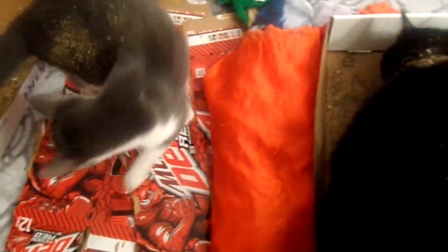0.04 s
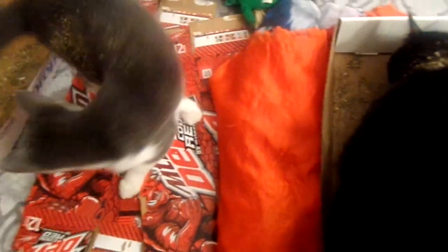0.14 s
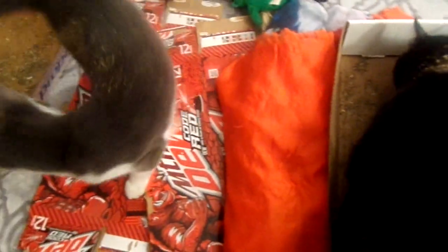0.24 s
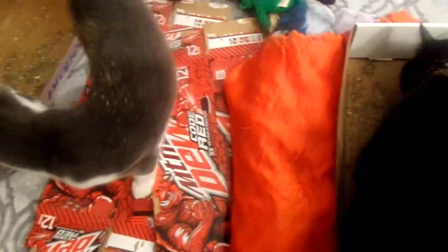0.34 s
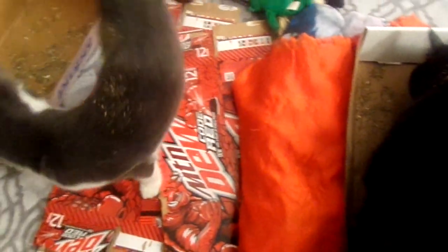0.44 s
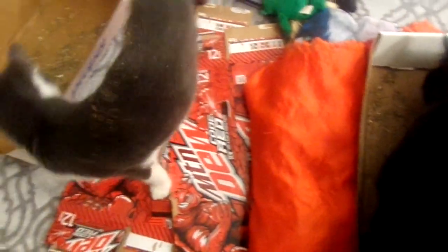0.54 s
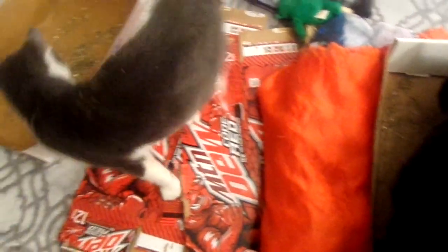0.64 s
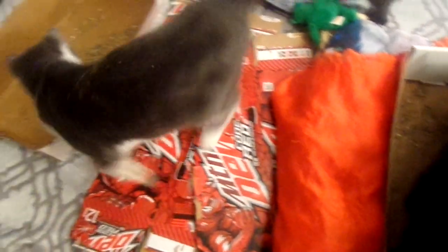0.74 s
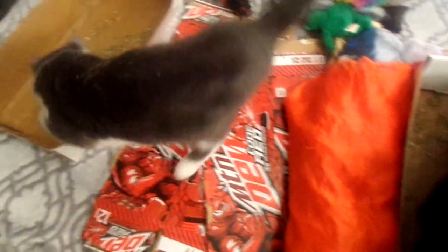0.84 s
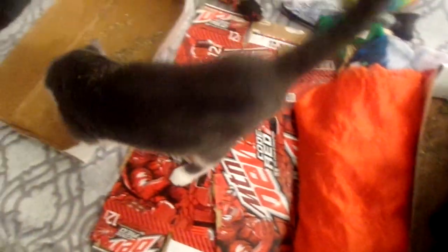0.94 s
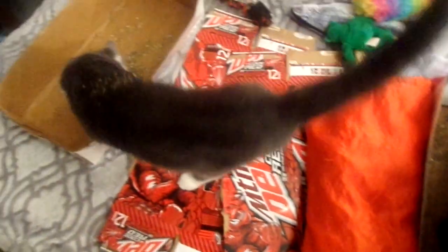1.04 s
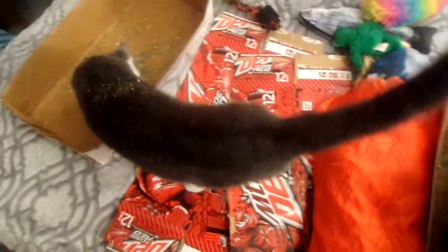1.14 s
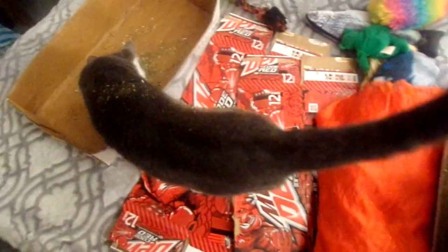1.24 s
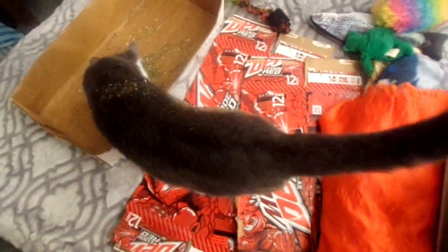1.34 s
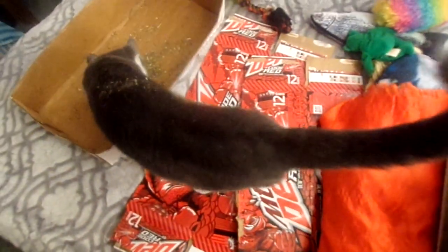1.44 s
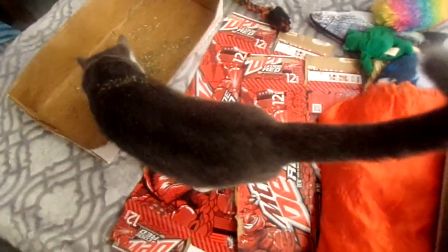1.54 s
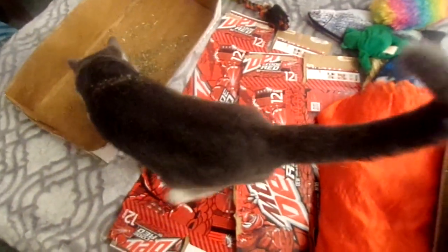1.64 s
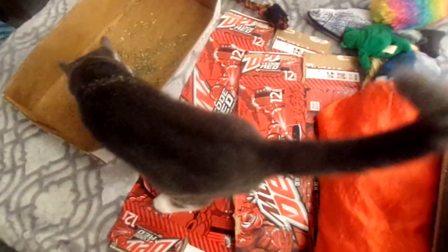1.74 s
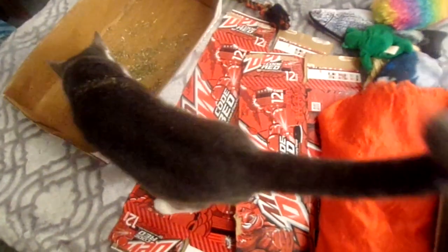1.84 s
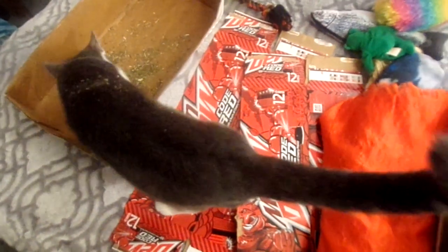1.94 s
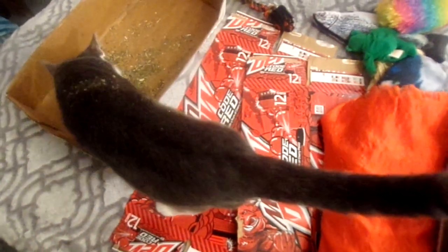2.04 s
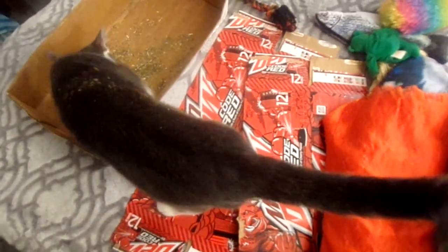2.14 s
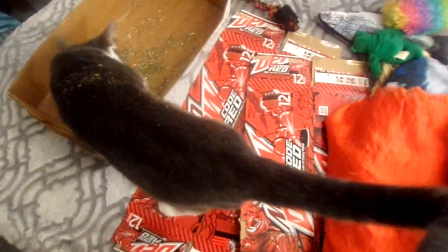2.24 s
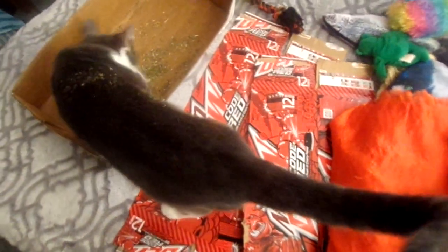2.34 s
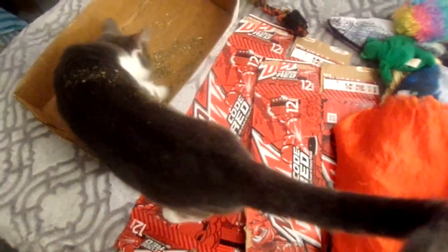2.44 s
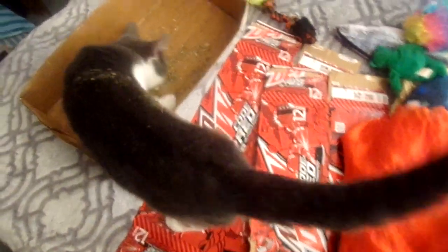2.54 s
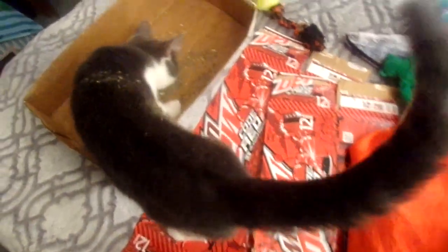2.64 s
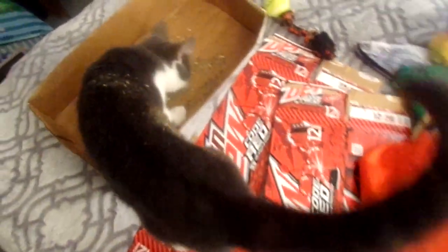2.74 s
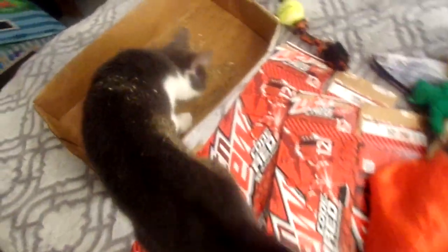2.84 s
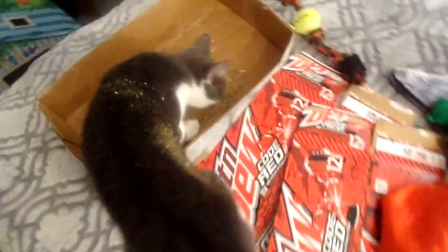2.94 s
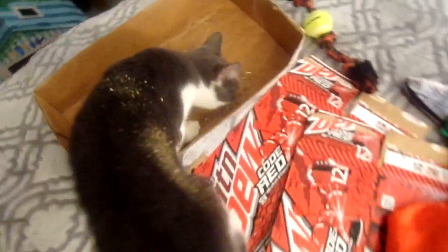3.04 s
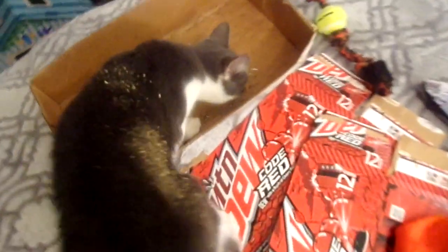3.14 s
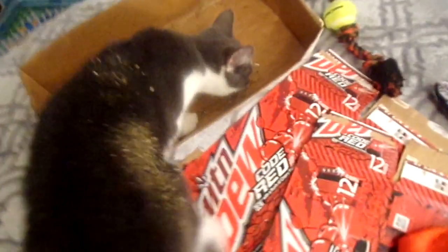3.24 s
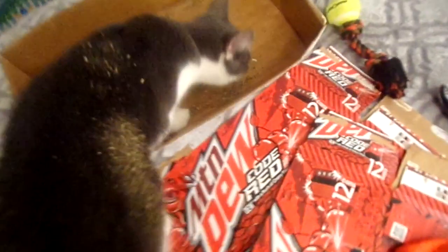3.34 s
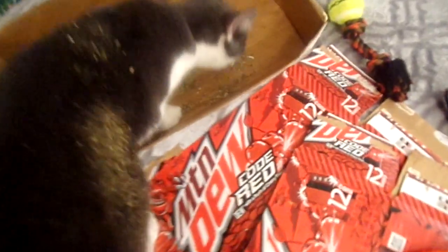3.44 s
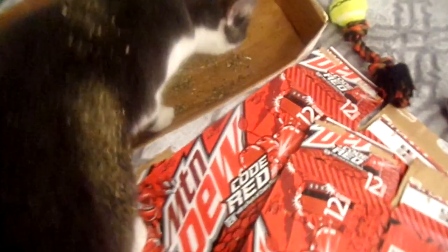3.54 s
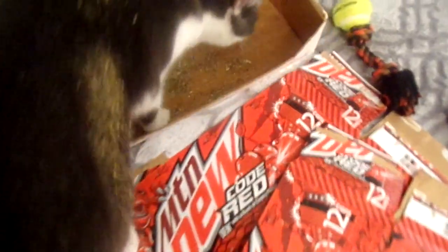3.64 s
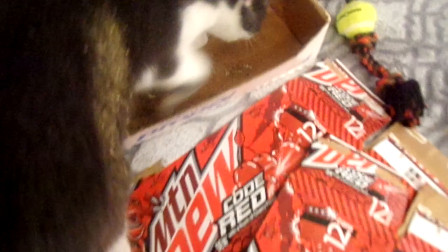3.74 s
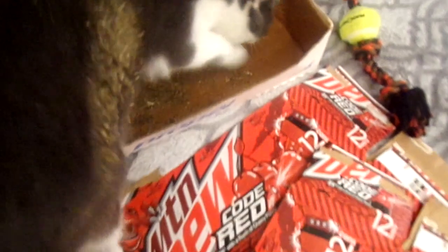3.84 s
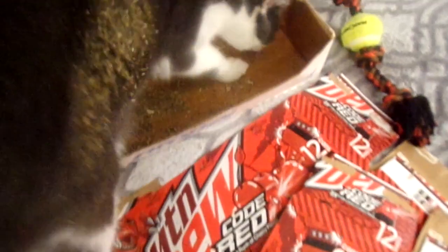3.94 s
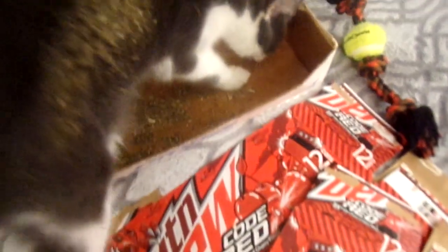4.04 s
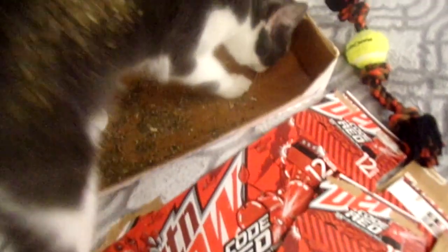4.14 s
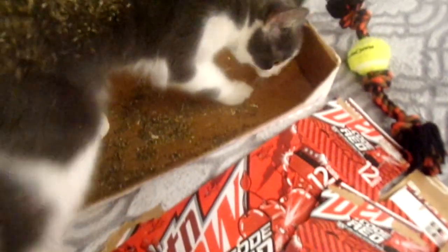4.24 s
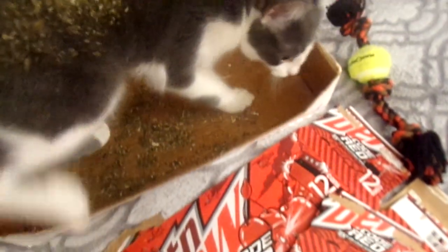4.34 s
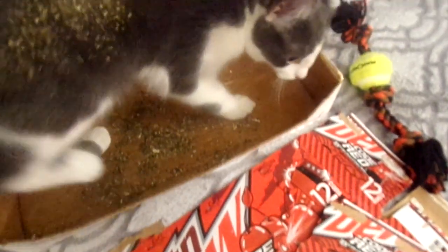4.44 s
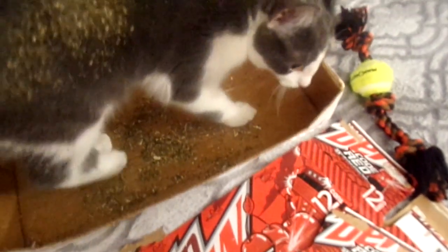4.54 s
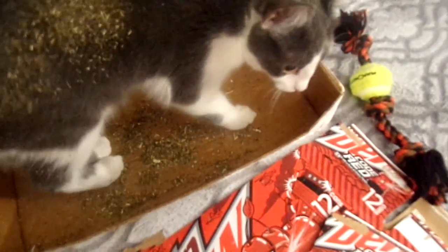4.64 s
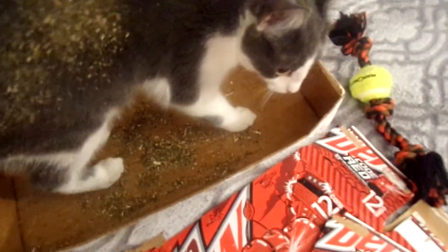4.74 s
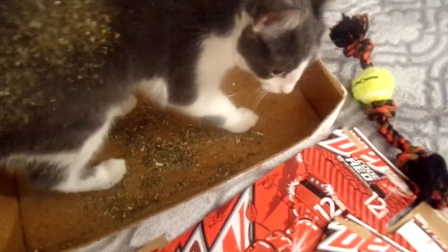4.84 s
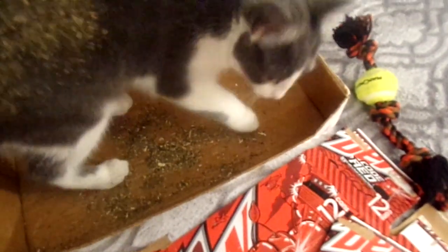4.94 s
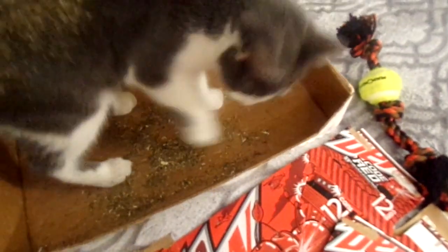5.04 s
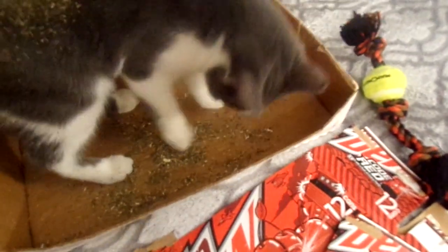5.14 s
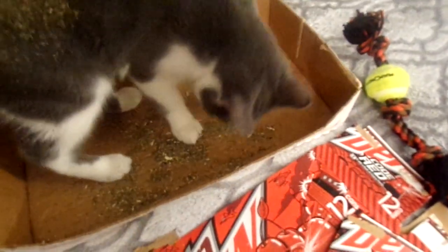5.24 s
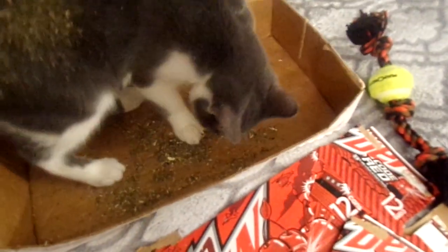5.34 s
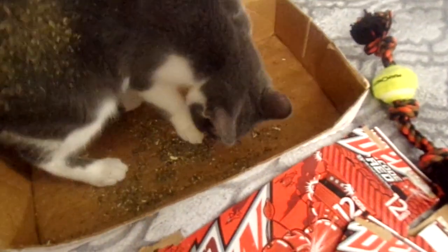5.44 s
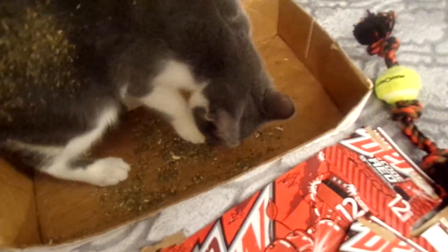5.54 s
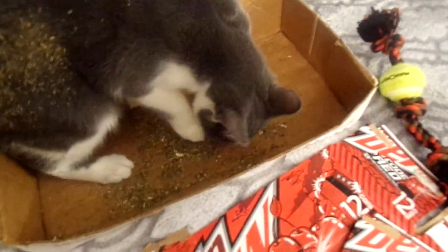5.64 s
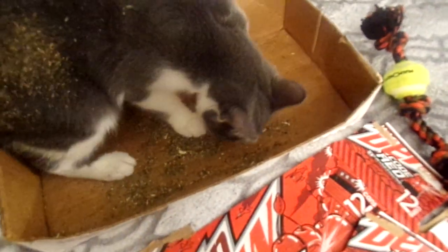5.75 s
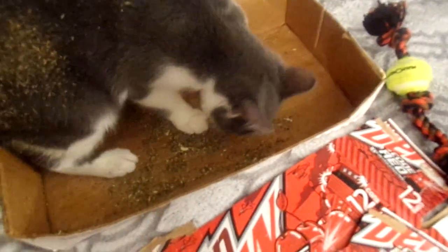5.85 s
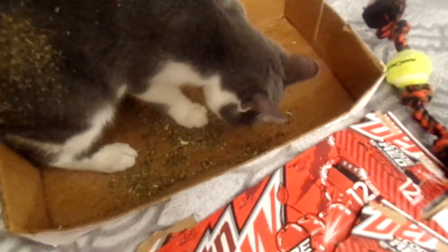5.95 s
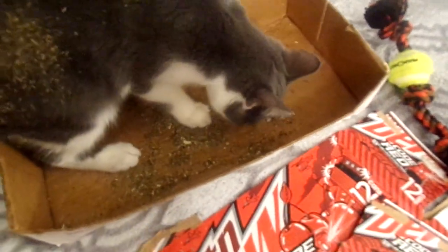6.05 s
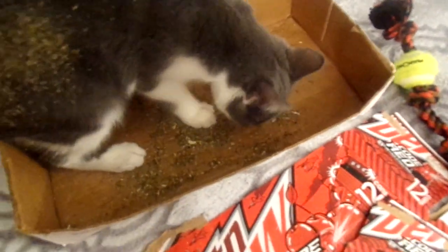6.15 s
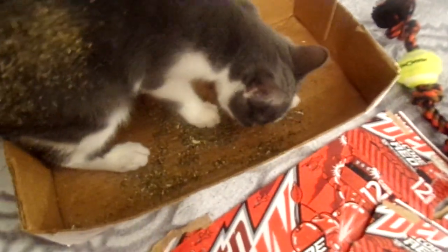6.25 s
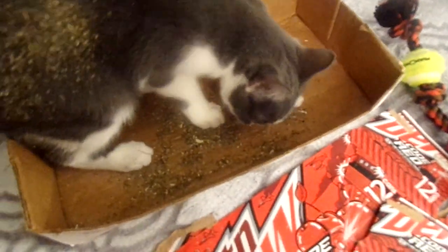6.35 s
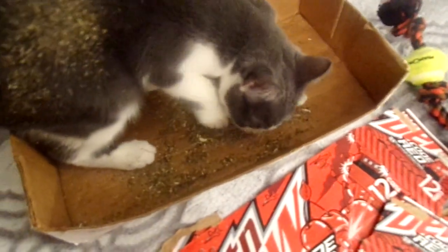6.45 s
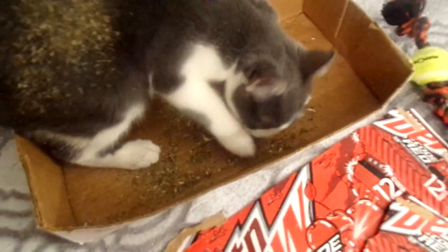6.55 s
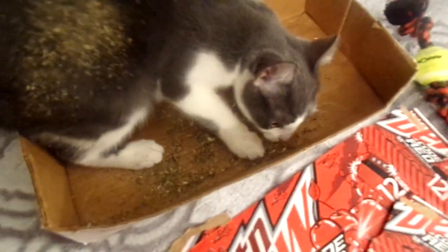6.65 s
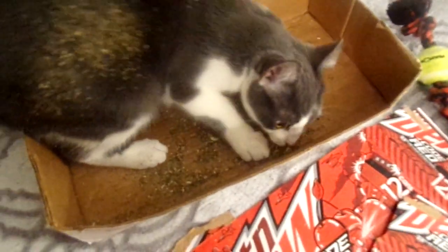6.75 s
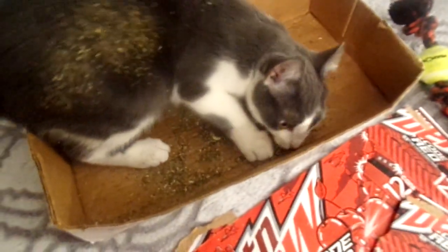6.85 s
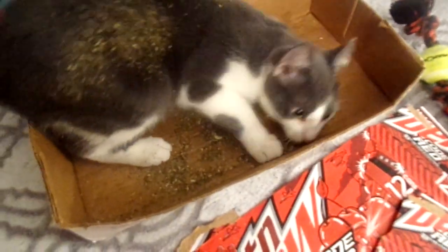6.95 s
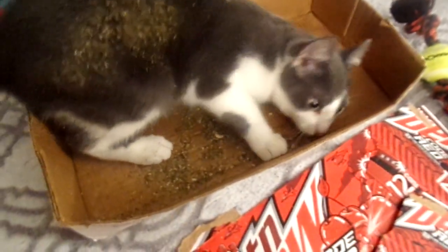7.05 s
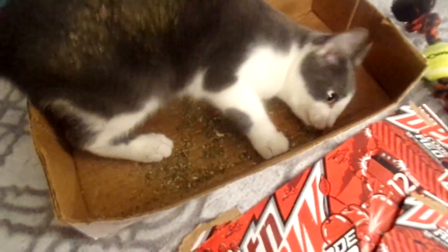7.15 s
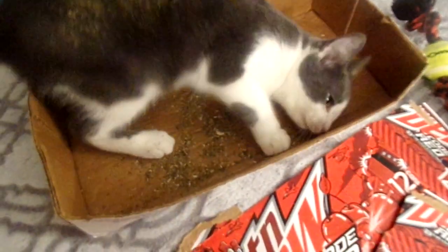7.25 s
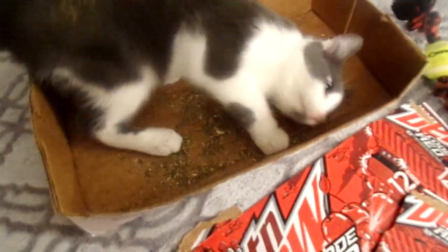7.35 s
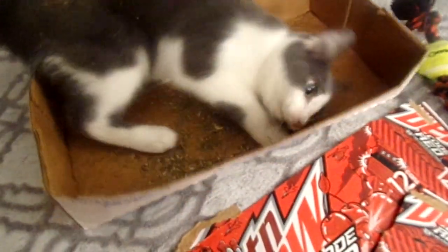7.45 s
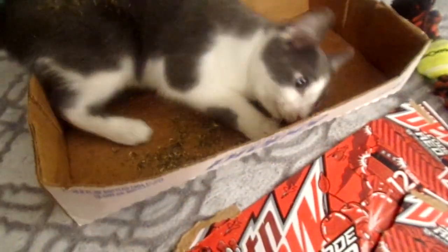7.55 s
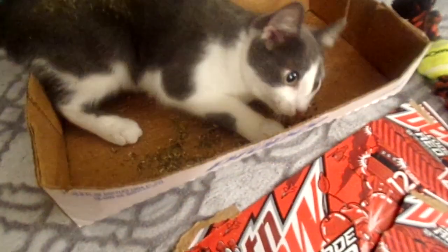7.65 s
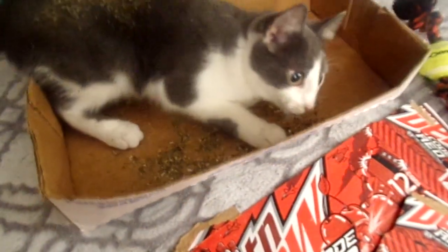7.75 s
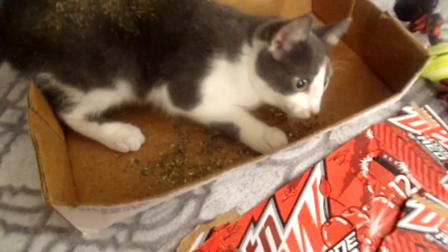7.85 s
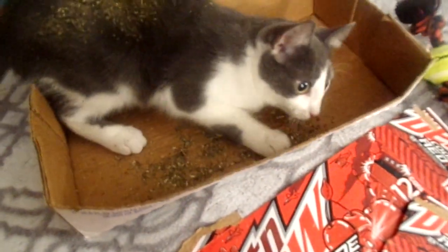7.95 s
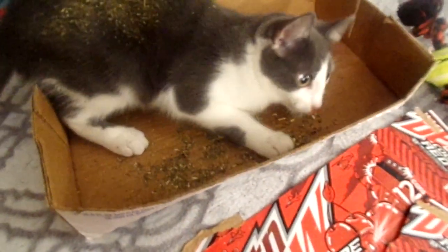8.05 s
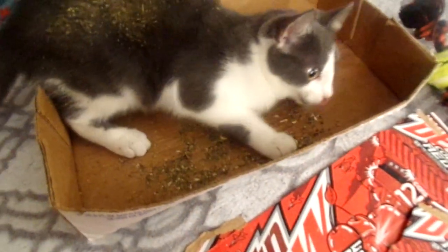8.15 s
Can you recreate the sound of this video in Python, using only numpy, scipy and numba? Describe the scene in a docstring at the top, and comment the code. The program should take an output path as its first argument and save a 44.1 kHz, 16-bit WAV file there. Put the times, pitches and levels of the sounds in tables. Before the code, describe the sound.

In a small furnished room, a low motor hum and soft rush continue throughout. A cat's paws make faint scuffs and dull taps on cardboard, sparse at first, then busier as it enters a box. Dry herbs rustle in short strokes, a claw scrapes with a rough judder, and louder rubs and taps finish. Heard close up through a handheld phone.

```python
"""A motor hums and whines under the rush of a small room while a cat steps over flat cartons into a box.
Paws scuff and tap from the start: filtered crumb grains rustle, and taps run through the board as falling chirps.
Then paws and head stroke dried herbs in moving bands of rustle and fur hiss, until a claw judders over the floor
in stick-slip pulses. Longer rubbing strokes and louder taps close the scene, all through a hand-held phone's
microphone."""
import sys
import numpy as np
from scipy import signal
from scipy.fft import rfft, irfft
from scipy.io import wavfile
from scipy.ndimage import uniform_filter1d
from numba import njit

SR = 44100
rng = np.random.default_rng(int(sys.argv[2]) if len(sys.argv) > 2 else 0)


def pcm_store(signal):
    """Save signal as 16-bit PCM."""
    levels = np.round(np.clip(np.atleast_2d(signal), -1, 1) * 32767)
    wavfile.write(sys.argv[1], SR, levels.astype(np.int16).T)


N = 361619
T = np.arange(N) / SR  # s
FREQS = np.maximum(np.arange(N // 2 + 1) * SR / N, 1)  # Hz, kept above zero


def undb(db):
    """Decibels to gain."""
    return 10 ** (np.asarray(db) / 20)


def unit(x):
    """Scale to rms 1."""
    return x / np.sqrt(np.mean(x ** 2))


def gains(points, freqs):
    """Gain of a colour at each frequency, drawn straight between its points on a log frequency axis."""
    hz, db = np.transpose(points)
    return undb(np.interp(np.log(freqs), np.log(hz), db))


def colour(x, points, response=1):
    """Filter by a colour and an optional resonant response; rms 1."""
    return unit(irfft(rfft(x) * gains(points, FREQS) * response, N))


def resonance(hz, width, freqs):
    """Complex response of one damped mode, 1 at its centre."""
    return 1 / (1 + 1j * (freqs ** 2 - hz ** 2) / (freqs * width))


def walk(rate):
    """Random levels, rate new ones per second, smoothed twice; rms 1."""
    hold = int(SR / rate)
    steps = np.repeat(rng.standard_normal(N // hold + 1), hold)
    smooth = uniform_filter1d(uniform_filter1d(steps, hold), hold)
    return unit(smooth[:N])


def grains(rate, spread_db):
    """Tiny impulses at random moments, rate per second, a few much larger than the rest."""
    size = undb(spread_db * np.minimum(rng.exponential(size=N), 4))
    struck = rng.random(N) < rate / SR
    return struck * size * rng.choice([-1, 1], N)


def add(out, s, sound):
    """Mix a short sound in at time s."""
    i = max(int(s * SR), 0)
    out[i:i + len(sound)] += sound[:N - i]


# Hum swelling and fading as the phone moves through the room's standing wave: [t/s, rms level/dB]
HUM_SWELL = [(0.05, -52), (0.21, -51), (0.43, -56), (1.18, -51.5), (1.67, -56), (2.19, -52.5), (2.4, -54.5),
             (3.27, -54), (3.61, -50), (3.95, -49), (4.16, -52.5), (5.46, -49.5), (5.65, -53.5),
             (6.32, -48.5), (6.84, -52.5), (7.2, -48.5), (7.54, -52.5), (8.15, -48.5)]
# Weaker lines of the motor: [multiple of the turning rate, rms level/dB]
WEAK_MOTOR_LINES = [(1, -86), (2, -72), (5, -74)]
# Spells of the faint high whine: [start t/s, end t/s, level/dB]
WHINE_SPELLS = [(0, 0.327, -86), (0.822, 1.33, -87), (1.95, 2.35, -88), (4.4, 4.9, -85)]
MOTOR_HZ = 57.22


def appliance(waver_db=0.22, whine_hz=8850, whine_width_hz=330):
    """A motor whose third harmonic fills the room, with weaker lines and a thin pulsing whine."""
    turn = 2 * np.pi * MOTOR_HZ * T
    s, db = np.transpose(HUM_SWELL)
    hum = np.sin(3 * turn) * undb(np.interp(T, s, db) + waver_db * walk(24))
    for multiple, db in WEAK_MOTOR_LINES:
        phase = 2 * np.pi * rng.random()
        hum = hum + np.sin(round(multiple) * turn + phase) * undb(db + 2.2 * walk(8.2))
    band = resonance(whine_hz, whine_width_hz, FREQS) ** 2
    whine = unit(irfft(rfft(rng.standard_normal(N)) * band, N))
    spells = sum(undb(db) * ((T > start) & (T < end)) for start, end, db in WHINE_SPELLS)
    swell = uniform_filter1d(spells, size=4000)
    pulse = 1 + .6 * np.sin(turn)  # once per turn
    return np.sqrt(2) * hum + whine * swell * pulse  # sqrt(2) turns sine peaks into rms levels


# Colour of the room's rush before its resonances: [f/Hz, relative level/dB]
ROOM_COLOUR = [(25, -7), (60, 3), (130, 8), (280, 7), (450, 1), (1000, -1), (1700, -6), (2500, -2.5),
               (3400, -1.5), (5000, -11.5), (7000, -19.5), (9000, -19), (10500, -34.5), (13000, -19.5),
               (15500, -20)]
ROOM_DB = -61.5  # mean rms level


def room_air():
    """Steady rush of the room and microphone hiss: coloured noise with two soft resonances."""
    response = 1 + 1.33 * resonance(600, 21, FREQS) + 1.54 * resonance(2513, 120, FREQS)
    rush = colour(rng.standard_normal(N), ROOM_COLOUR, response)
    return undb(ROOM_DB + .5 * walk(7.6)) * rush


def settling(level_db=-74):
    """Faint stray ticks, dulled by one wide resonance, as the cardboard settles under the cat's weight."""
    ticks = grains(rate=40, spread_db=3)
    return undb(level_db) * colour(ticks, TAP_COLOUR, resonance(1860, 1600, FREQS))


# Small scuffs of paws and flank, treble and body relative to the level:
# [t/s, length/s, level/dB, treble/dB, body/dB]
PAW_SCUFFS = [(0.078, 0.011, -50.5, -40, -6), (0.26, 0.015, -55.5, -20, -10), (0.424, 0.027, -57, -36, -10),
              (0.471, 0.04, -58, -36, -14), (0.63, 0.01, -57.5, -30, -16), (0.894, 0.019, -58, -37, -7),
              (1.125, 0.02, -61.5, -24, -16), (1.362, 0.033, -57, -32, -13),
              (1.452, 0.049, -62.5, -20, -12), (1.581, 0.027, -57.5, -25, -5), (1.75, 0.059, -63, -22, -3),
              (3.189, 0.063, -60.5, -25, -10), (3.305, 0.025, -53.5, -35, -12),
              (3.509, 0.027, -47.5, -16, -5), (3.531, 0.078, -59.5, -16, -4), (3.671, 0.05, -58, -12, -10),
              (3.855, 0.023, -58, -14, -4), (3.99, 0.048, -52, -23, -12), (4.178, 0.029, -56.5, -12, -6),
              (4.524, 0.062, -59, -23, -11), (4.653, 0.047, -54, -25, -14)]
SCUFF_HZ = 2630  # rustle pitch of every scuff


def scuffs(grip_s=0.0046, release_s=0.0027):
    """A paw grips at once, slides and lets go; gives the drive of crumbs, fur hiss and board."""
    drive = np.zeros((3, N))
    t = T[:SR // 4]
    for s, length_s, db, treble_db, body_db in PAW_SCUFFS:
        grip = 1 - np.exp(-t / grip_s)
        release = np.exp(-np.maximum(t - length_s, 0) / release_s)
        for row, share_db in zip(drive, (0, treble_db, body_db)):
            add(row, s, grip * release * undb(db + share_db))
    return drive


PRESS_CURVE, EASE_CURVE = 1.22, 1.52  # exponents of a stroke's rise and fall


def stroke(press_s, ease_s):
    """Pressure of one stroke: it builds to a rounded top, then eases off."""
    length_s = press_s + ease_s
    t = T[:int(length_s * SR)]
    rise = np.sin(np.pi / 2 * np.clip(t / press_s, 0, 1))
    fall = np.sin(np.pi / 2 * np.clip((length_s - t) / ease_s, 0, 1))
    return rise ** PRESS_CURVE * fall ** EASE_CURVE


# How heavily the cat leans and shifts between strokes, before fidgeting: [t/s, level/dB]
LEAN_WEIGHT = [(0, -70.5), (1.8, -73), (2.2, -73), (4.75, -77.5), (4.85, -59), (5.47, -63), (5.62, -69.5),
               (5.8, -57.5), (6.02, -58.5), (6.12, -72), (6.27, -57), (6.75, -59), (7.04, -64.5),
               (7.39, -62), (7.66, -62.5), (8.2, -63)]
# Strokes of head and paws through the herbs, treble and body relative to the level:
# [t/s, pressing/s, easing/s, level/dB, f/Hz, treble/dB, body/dB]
HERB_STROKES = [(0.082, 0.02, 0.17, -61, 2780, -40, -12), (1.62, 0.042, 0.048, -52, 3440, -21, -28),
                (4.805, 0.095, 0.017, -52.5, 2800, -19.5, -8), (4.905, 0.049, 0.053, -54.5, 2600, -22, -4),
                (5.114, .043, 0.053, -46.5, 2360, -18, -11), (5.217, 0.049, 0.036, -35.5, 2870, -21, -18),
                (5.31, 0.18, 0.038, -58, 2630, -20, -17), (5.522, 0.027, 0.037, -54.5, 2500, -18, -11.5),
                (5.663, .022, 0.043, -51.5, 2740, -21, -12), (6.157, 0.031, 0.033, -51, 2280, -17, -5.5),
                (6.228, 0.033, 0.026, -43.5, 2500, -17, -10.5), (6.47, 0.022, .016, -51.5, 2660, -8, -9),
                (6.517, 0.012, 0.016, -52, 2600, -5, -11), (6.592, .04, .03, -57.5, 2550, -27, -3),
                (6.657, 0.025, 0.16, -52, 2860, -16.5, -16), (6.823, 0.13, 0.056, -40, 2560, -17.5, -14.5),
                (7.1, 0.026, 0.19, -49, 2600, -17.5, -11.5), (7.216, 0.094, .1, -41.5, 2500, -16, -13),
                (7.386, 0.14, 0.07, -38, 2980, -20, -17.5), (7.535, 0.027, 0.049, -42.5, 2820, -17, -8),
                (7.84, 0.1, 0.33, -60, 2600, -10.5, -15)]
LEAN_HZ, LEAN_TREBLE_DB, LEAN_BODY_DB = 2550, -18, -7.5
FIDGET_DB, FIDGETS_PER_S = 1.0, 22


def contact():
    """Leaning, scuffs and strokes add in power: mean pitch, and the drive of crumbs, fur hiss and board."""
    s, db = np.transpose(LEAN_WEIGHT)
    lean = undb(np.interp(T, s, db) + FIDGET_DB * walk(FIDGETS_PER_S))
    leaning = np.outer(undb([0, LEAN_TREBLE_DB, LEAN_BODY_DB]), lean) ** 2
    paws = scuffs() ** 2
    power = leaning + paws
    weighted_pitch = leaning[0] * LEAN_HZ + paws[0] * SCUFF_HZ
    for s, press_s, ease_s, db, hz, treble_db, body_db in HERB_STROKES:
        push = (stroke(press_s, ease_s) * undb(db)) ** 2
        add(weighted_pitch, s, push * hz)
        for row, share_db in zip(power, (0, treble_db, body_db)):
            add(row, s, push * undb(share_db) ** 2)
    return weighted_pitch / power[0], np.sqrt(power)


@njit
def moving_band(x, hz, width):
    """State-variable band-pass whose centre and width move every sample."""
    y, band, low = np.empty(len(x)), 0., 0.
    for i in range(len(x)):
        g, k = np.tan(np.pi * hz[i] / SR), width[i] / hz[i]
        v = (band + g * (x[i] - low)) / (1 + g * (g + k))
        band, low, y[i] = 2 * v - band, low + 2 * g * v, k * v
    return y


# Resonances of the box: [f/Hz, width/Hz, level/dB]
BOX_MODES = [(599, 30, 0.5), (783, 50, 5), (1046, 32, 1), (1210, 11, -19), (1268, 74, -4.5),
             (1790, 23, 3.5), (1870, 29, -7), (2327, 40, -2), (2510, 63, -3.5), (3270, 24, 4),
             (3454, 55, -2.5), (3980, 82, -9), (4040, 32, -31)]


def box(freqs, direct):
    """The box's modes on top of the sound that leaves the contact directly."""
    return direct + sum(undb(db) * resonance(hz, width, freqs) for hz, width, db in BOX_MODES)


# Colour of crumbs fracturing, before box and moving band: [f/Hz, relative level/dB]
RUSTLE_COLOUR = [(900, -32), (1600, -0.5), (2000, 0), (2500, 0.5), (3300, 0.5), (4000, -3), (5200, 1),
                 (6500, -8), (8500, -26), (12000, -36)]
# Colour of fur brushing over crumbs: [f/Hz, relative level/dB]
FUR_COLOUR = [(4000, -4), (5300, 3), (6500, 1.5), (9000, 18), (10500, 2), (13000, -6), (15500, 1)]
# Colour of the shaken board, before the box modes: [f/Hz, relative level/dB]
BOARD_COLOUR = [(120, -7), (280, 5.5), (800, 1.5), (1400, 0), (2200, -48), (4000, -23.5)]


def herbs(patchy_db=1.37, focus_hz=990.0, broad=0.16, fizz_db=-6, firm_db=-57, stalk_db=-13, flake_db=-11):
    """Dense crumb fractures rustle and shake the board beneath, while fur hisses over them."""
    pitch, drive = contact()
    crumb, hiss, body = drive * undb(patchy_db * walk(110))
    modes = box(FREQS, direct=0)
    cracks = grains(rate=5000, spread_db=3)
    # a bare paw rings narrowly; the more fur in the contact, the broader the rustle
    breadth = np.sqrt(np.clip(10 * hiss / (crumb + 1e-9), .2, 2))
    rustle = colour(cracks, RUSTLE_COLOUR, 1.5 + modes)
    rustle = moving_band(rustle, pitch, focus_hz * breadth) + broad * breadth * rustle
    rustle = unit(rustle / breadth ** 0.94)  # evens out the loudness of broad and narrow
    board = colour(cracks, BOARD_COLOUR, 0.83 + modes)
    fur = colour(grains(rate=6800, spread_db=3.5), FUR_COLOUR)
    # firm rubbing adds a fizz at the very top
    fizz = colour(rng.standard_normal(N), [(7000, -24), (13000, 4)]) * np.sqrt(hiss / undb(firm_db))
    fur = fur + undb(fizz_db) * fizz
    # now and then a stalk snaps or a dry flake ticks above the rest
    stalks = colour(grains(rate=160, spread_db=3.5), TAP_COLOUR, resonance(2550, 1200, FREQS))
    flakes = colour(grains(rate=130, spread_db=1.5), FUR_COLOUR)
    rustle = rustle + undb(stalk_db) * stalks
    fur = fur + undb(flake_db) * flakes
    return crumb * rustle + hiss * fur + body * board


def bending_wave(points, hz, width_hz, travel_ms, scatter, scatter_decay, size=4096, loss_db=0.76):
    """One blow on cardboard, peak 1: high notes travel faster, so it arrives as a falling chirp."""
    freqs = np.maximum(np.arange(size // 2 + 1) * SR / size, 1)
    khz = freqs / 1000
    delay = np.exp(-4j * np.pi * travel_ms * np.sqrt(khz))
    # a longer path also eats more of the treble: loss_db per ms and kHz
    path = delay * undb(-loss_db * travel_ms * khz)
    # folds and edges send back a short scatter that rings in the box's modes
    scattered = rng.standard_normal(size) * np.exp(-T[:size] / scatter_decay)
    echoes = rfft(scattered) * box(freqs, direct=0.74)
    echoes = scatter * echoes / np.sqrt(np.mean(np.abs(echoes) ** 2))
    chirp = irfft(gains(points, freqs) * resonance(hz, width_hz, freqs) * path * (1 + echoes))
    return chirp / np.abs(chirp).max()


# Taps and snaps in the cardboard, peaks without floor ring and room: [t/s, peak level/dB, f/Hz]
BOARD_TAPS = [(0.0785, -38.5, 2840), (0.0806, -40, 2720), (0.085, -39, 2670), (0.432, -45, 2400),
              (0.905, -41.5, 2600), (1.237, -43.5, 2650), (1.373, -41, 2960), (1.586, -40, 2580),
              (1.739, -39.5, 2480), (2.325, -54, 692), (2.9175, -45.5, 1790), (3.3074, -40, 2493),
              (3.4653, -40, 4150), (3.531, -54, 2420), (3.869, -45, 2090), (3.993, -45, 2350),
              (4.006, -35, 2320), (4.0181, -30, 2260), (4.073, -36, 2610), (4.199, -32.5, 2700),
              (4.514, -38, 2630), (4.53, -42, 2220), (4.579, -41.5, 2300), (4.5973, -42, 2230),
              (4.666, -32, 2650), (4.6686, -33, 2630), (4.8864, -41, 2600), (4.941, -40, 2470),
              (4.955, -38, 2490), (5.2346, -46, 2680), (5.6662, -47, 2900), (6.197, -46, 1093),
              (6.2412, -31, 4480), (6.26, -21, 2437), (6.3855, -40, 1950), (6.4397, -23.5, 2650),
              (6.4516, -30, 2640), (6.575, -31.5, 2140), (6.632, -37.5, 2650), (6.9164, -27, 2530),
              (6.977, -27, 2510), (7.089, -34, 2220), (7.0882, -36.5, 912), (7.1103, -32.5, 3190),
              (7.357, -30, 2950), (7.8, -38.5, 2480)]
# Colour of a tap before its own resonance: [f/Hz, relative level/dB]
TAP_COLOUR = [(200, -55), (600, 0), (1000, -8.5), (1500, -5.5), (2000, 0.5), (2700, 1.5), (3400, 1),
              (4200, -8), (6000, -4.5), (9000, -5), (15500, -23)]
TRAVEL_MS, TYPICAL_TAP_HZ = 3.9, 2600  # travel time of the 1 kHz wave for a typical tap
TRAVEL_SLOPE = .65  # duller taps have come further


def taps(relative_width=0.3, floor_hz=605, floor_db=-25, floor_t60=0.098):
    """Paws, claws and buckling board; a softer contact has a lower pitch, and each sets the box floor ringing."""
    out, t = np.zeros(N), T[:SR // 4]
    # the floor's lowest mode builds up as the slow waves arrive
    build_up = 1 - np.exp(-(t / 0.0043) ** 2)
    ring = np.sin(2 * np.pi * floor_hz * t) * np.exp(-np.log(1000) * t / floor_t60) * build_up
    for s, db, hz in BOARD_TAPS:
        travel_ms = TRAVEL_MS * (TYPICAL_TAP_HZ / hz) ** TRAVEL_SLOPE
        tap = bending_wave(TAP_COLOUR, hz, relative_width * hz, travel_ms, scatter=0.36, scatter_decay=0.013)
        add(out, s, undb(db) * tap)
        add(out, s, undb(db + floor_db) * ring)
    return out


# The loudest dry crumbs cracking, peaks without the room: [t/s, peak level/dB, f/Hz]
LOUD_CRUMBS = [(0.2678, -54, 13000), (0.677, -55, 6000), (3.04, -55, 7000), (3.105, -55, 6500),
               (3.466, -46, 12700), (4.1876, -48, 9100), (4.2012, -58, 8500), (6.024, -58, 5500),
               (6.377, -46, 13500), (6.493, -50, 9500), (6.5226, -47, 9370), (7.1108, -41, 9400),
               (7.558, -36, 5200), (7.662, -54, 5500), (7.8014, -44, 8350)]


def crumbs(decay=0.00095, width_hz=4500):
    """A dry leaf breaks: a millisecond of bright noise."""
    out, size = np.zeros(N), 1024
    freqs = np.maximum(np.arange(size // 2 + 1) * SR / size, 1)
    for s, db, hz in LOUD_CRUMBS:
        burst = rng.standard_normal(size) * np.exp(-T[:size] / decay)
        tick = irfft(rfft(burst) * resonance(hz, width_hz, freqs))
        add(out, s, tick / np.abs(tick).max() * undb(db))
    return out


# The claw catches and slips, peaks without judder and room: [t/s, peak level/dB, f/Hz]
CLAW_SLIPS = [(5.8452, -21, 3600), (5.8538, -24, 4000), (5.858, -20, 4000), (5.864, -16.5, 3300),
              (5.871, -21, 3600), (5.8722, -18.5, 1500), (5.9112, -26.5, 2000)]
# Colour of the judder before the box: [f/Hz, relative level/dB]
CLAW_COLOUR = [(100, -21), (280, -7), (600, -8.5), (850, -7.5), (1300, 1.5), (1600, -5.5), (2000, 4),
               (3300, -3.5), (5200, -20), (6000, -25.5), (9000, -38), (15500, -45)]
# Colour of a hard slip before its own resonance: [f/Hz, relative level/dB]
SLIP_COLOUR = [(200, -21), (700, -11), (1400, -15), (2000, 5), (3200, -1), (4300, 7.5), (5200, 4),
               (6000, -15), (9000, -13), (15500, -26)]
# A claw dragged over the box floor bites, loses force and lifts
DRAG_START_S, DRAG_LIFT_S, DRAG_BITE_S, DRAG_RELEASE_S = 5.816, 5.972, 0.034, 0.015
DRAG_DB, DRAG_SAG_DB_PER_S = -31, 44.5


def claw():
    """Dense stick-slip pulses ring the box; a few hard slips crack out of them."""
    t = np.maximum(T - DRAG_START_S, 0)
    bite = np.minimum(t / DRAG_BITE_S, 1) ** 2
    lift = np.exp(-np.maximum(T - DRAG_LIFT_S, 0) / DRAG_RELEASE_S)
    judder = colour(grains(rate=6000, spread_db=1.5), CLAW_COLOUR, box(FREQS, direct=0.89))
    out = judder * bite * lift * undb(DRAG_DB - DRAG_SAG_DB_PER_S * t)
    for s, db, hz in CLAW_SLIPS:
        crack = bending_wave(SLIP_COLOUR, hz, width_hz=2700, travel_ms=3.5, scatter=0.81, scatter_decay=0.0015)
        add(out, s, undb(db) * crack)
    return out


def walls(x, wet_db=-14, t60=0.19):
    """Short, soft reflections of a furnished room: a decaying noise tail."""
    t = T[:SR // 2]
    tail = rng.standard_normal(len(t)) * np.exp(-np.log(1000) * t / t60) * (t > .004)
    return x + undb(wet_db) * signal.fftconvolve(x, tail / np.linalg.norm(tail))[:N]


def scene():
    """The cat in its box over the hum of the room."""
    cat = settling() + herbs() + taps() + crumbs() + claw()
    return (appliance() + room_air() + walls(cat))[None]


# Narrow dips in the microphone's response: [f/Hz, width/Hz]
MICROPHONE_DIPS = [(3675, 220), (4380, 235), (8010, 2100), (11710, 900)]
TOP_HZ = 15800


def record(dry):
    """The phone's microphone has four dips and a steep top edge."""
    response = np.prod([1 - .95 * resonance(hz, width, FREQS) for hz, width in MICROPHONE_DIPS], axis=0)
    heard = irfft(rfft(dry) * response, N)
    top_edge = signal.ellip(12, .2, 70, TOP_HZ, fs=SR, output="sos")
    return signal.sosfilt(top_edge, heard)


dry = scene()
out = record(dry)
pcm_store(out)
```